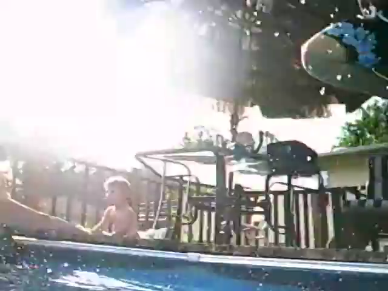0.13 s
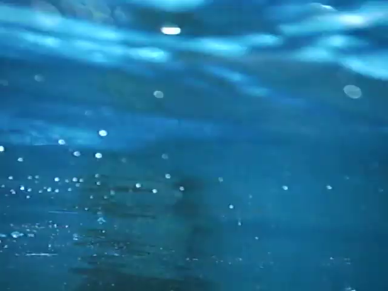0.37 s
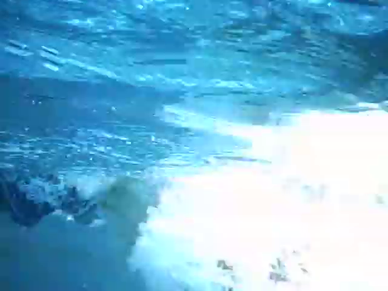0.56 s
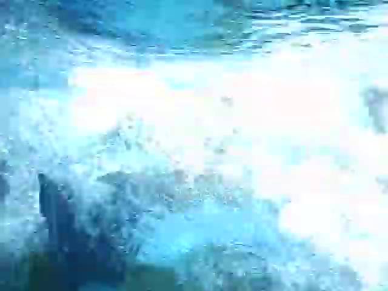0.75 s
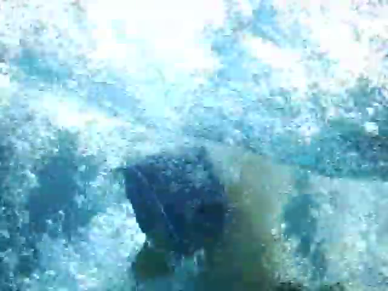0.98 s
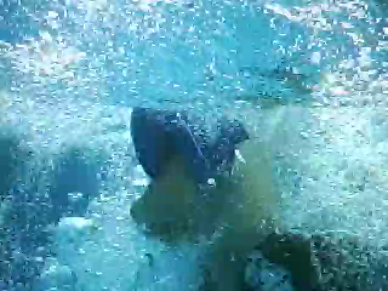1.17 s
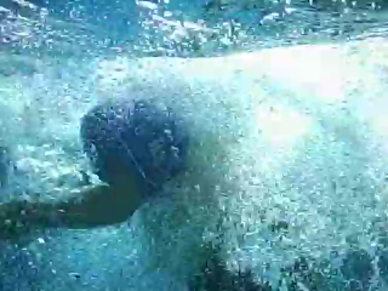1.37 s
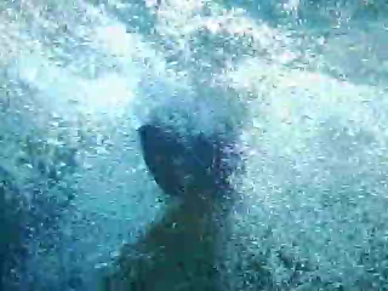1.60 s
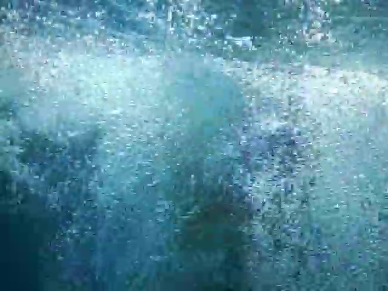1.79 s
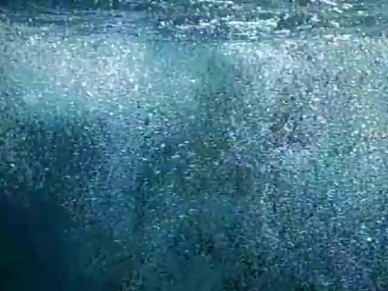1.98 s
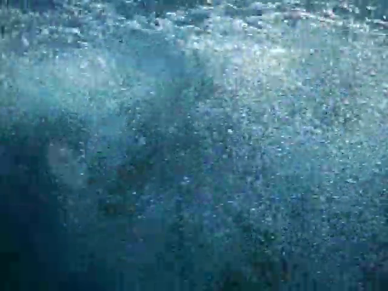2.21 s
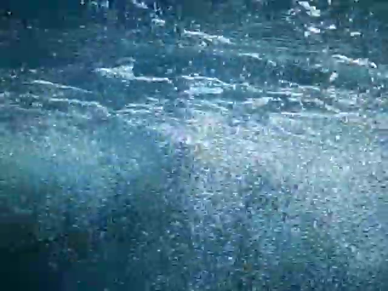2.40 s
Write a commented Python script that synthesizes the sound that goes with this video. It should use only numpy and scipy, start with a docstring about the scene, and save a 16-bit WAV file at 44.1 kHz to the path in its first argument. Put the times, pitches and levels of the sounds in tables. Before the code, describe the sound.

Heard close from inside a waterproof case, a harsh clipping plunge with knocking bubbles breaks out almost at once, then drops to dull underwater rushing and fine fizz, with soft glugs and gurgling near the end.

```python
"""Air pockets ring against a waterproof camera case, dunked as someone jumps into a pool beside it.
Each is a dying sine, the loudest strong enough to overload the microphone amplifier.
Crackling slaps, low thuds and glugs join in; clicks through case resonances and sine swarms fizz as a cloud.
Pitched swarms make the plunge's churn, an arm stroke and a gurgle near the end.
Filtered clicks wash round the case at the start, and filtered noise rumbles throughout."""
import sys
import numpy as np
from scipy import signal
from scipy.fft import rfft, irfft
from scipy.io import wavfile

SR = 44100
rng = np.random.default_rng(int(sys.argv[2]) if len(sys.argv) > 2 else 0)


def wrap_up_sound(samples):
    """Save the sound to the file named by the first command line argument, as 16-bit audio."""
    columns = np.atleast_2d(samples).T
    # keep every value between -1 and 1, then stretch to whole-number steps
    tamed = np.clip(columns, -1, 1)
    steps = np.round(tamed * 32767).astype(np.int16)
    wavfile.write(sys.argv[1], SR, steps)


N = 108045
TIME = np.arange(N) / SR  # s
HZ = np.fft.rfftfreq(N, 1 / SR)

# Tone of water striking the case, for slaps and pinch-off clicks: (frequency [Hz], gain [dB])
SLAP_COLOUR = [(60, -23.5), (300, 0.5), (700, 9.5), (1300, 11), (1900, 7), (3300, 6), (4200, -0.5)]
# Resonances of the case under water: (frequency [Hz], half-width at half gain [Hz], level [dB])
CASE_MODES = [(841.6, 56, 3), (1250, 55, -0.5), (1571, 88, 2.5), (1975, 63, -2.5), (2540, 27, -6)]
CASE_FLOOR_DB = -23  # gain added at every frequency beneath the resonances

WAVER, WAVER_HZ = 0.019, 60  # depth (share of pitch) and rate of a bubble's waver
PINCH_CYCLES = 1.07  # cycles a bubble takes to swell
BUBBLE_GLIDE = 0.071  # rise in log pitch over the ring time


def amp(db):
    """Decibels to gain."""
    return 10 ** (np.asarray(db) / 20)


def unit(x):
    """Scales to rms 1."""
    return x / np.sqrt(np.mean(x ** 2) + 1e-20)


def level(points):
    """Gain over time from (s, dB) points."""
    return amp(np.interp(TIME, *np.transpose(points)))


def colour(points, hz=HZ):
    """Gain over frequency from (Hz, dB) points, joined along log frequency."""
    f, db = np.transpose(points)
    return amp(np.interp(np.log(hz + 1), np.log(f), db))


def peaks(modes):
    """Gain over frequency of a set of resonances, summed in power."""
    power = sum(amp(db) ** 2 / (1 + ((HZ - hz) / width) ** 2) ** 2 for hz, width, db in modes)
    return np.sqrt(power)


def ring(x, gain):
    """Minimum-phase filter with the given gain, so sound follows its cause; output at rms 1."""
    cepstrum = irfft(np.log(np.maximum(gain, 1e-5)), N)
    # Folding the cepstrum forward makes the filter causal
    cepstrum[1:N // 2] *= 2
    cepstrum[N // 2:] = 0
    response = np.exp(rfft(cepstrum))
    return unit(irfft(rfft(x) * response, N))


def pops(per_s, spread_db):
    """Random clicks of either sign and uneven size."""
    size = amp(spread_db * np.minimum(rng.exponential(1, N), 4))
    sign = rng.choice([-1, 1], N)
    return size * sign * (rng.random(N) < per_s / SR)


def flutter():
    """A gain that wanders at random: smoothed noise in decibels."""
    depth_db, corner_hz = 1.5, 35  # rms depth; smoothing frequency
    smooth = np.exp(-(HZ / corner_hz) ** 2)
    wander = irfft(rfft(rng.standard_normal(N)) * smooth, N)
    return amp(depth_db * unit(wander))


def add(mix, s, sound):
    """Mixes a sound in at time s."""
    part = mix[round(s * SR):][:len(sound)]
    part += sound[:len(part)]


def bubble(hz, t60, attack_cycles, glide):
    """A pocket of air: a dying sine that swells quickly, then glides and wavers as it rings."""
    t = np.arange(0, t60, 1 / SR)
    waver = WAVER * np.sin(2 * np.pi * (WAVER_HZ * t + rng.random()))
    turns = np.cumsum(hz * np.exp(glide * t / t60 + waver)) / SR
    swell = 1 - np.exp(-(turns / attack_cycles) ** 2)
    decay = np.exp(-np.log(1000) * t / t60)  # down 60 dB at t60
    return swell * decay * np.sin(2 * np.pi * turns)


def swarm(pitch_colour, per_s, spread_db, count=36):
    """Many bubbles of random pitch and strength: each pitch rings at its own random clicks."""
    bubble_cycles = 47  # cycles until a bubble has died away
    out = np.zeros(N)
    pitches = np.geomspace(pitch_colour[0][0], pitch_colour[-1][0], count)
    for hz in pitches * rng.uniform(0.894, 1.041, count):
        one = bubble(hz, bubble_cycles / hz, PINCH_CYCLES, BUBBLE_GLIDE)
        one = one / np.linalg.norm(one)  # equal energy at every pitch
        births = pops(per_s / count, spread_db)
        out += colour(pitch_colour, hz) * signal.oaconvolve(births, one)[:N]
    return unit(out)


def flow():
    """Water washing round the case: clicks through two resonances, over a rumble of filtered noise."""
    # Resonances of the surface wash: (frequency [Hz], half-width at half gain [Hz], level [dB])
    lap_modes = [(1310, 88, -6), (2700, 38, -18.5)]
    # Wash at the surface: (time [s], level [dB])
    lap_level = [(0, -29.5), (.05, -30.5), (.105, -34), (.19, -79)]
    # Tone of the flow rumble: (frequency [Hz], gain [dB])
    rumble_colour = [(15, -7), (40, -4.5), (120, 2), (200, -2), (400, -10.5), (900, -23.5)]
    # Flow rumble: (time [s], level [dB])
    rumble_level = [(0, -40), (.19, -50), (.5, -38.5), (1.3, -47), (2.0, -41.5), (2.45, -45.5)]
    lap = ring(pops(per_s=4000, spread_db=1.2), peaks(lap_modes))
    rumble = ring(rng.standard_normal(N), colour(rumble_colour))
    return level(lap_level) * lap + level(rumble_level) * rumble


def cloud():
    """Countless tiny bubbles: each case resonance flutters on its own, and the finest tinkle above."""
    # Body of the bubble cloud: (time [s], level [dB])
    body_level = [(0, -31.5), (.11, -44.5), (.14, -43.5), (.19, -43), (.65, -30), (.74, -24), (1.0, -25),
                  (1.22, -28.5), (1.31, -25), (1.39, -32.5), (1.5, -29), (1.7, -36), (1.8, -29),
                  (2.24, -39), (2.27, -38), (2.45, -40)]
    # Finest fizz: (time [s], level [dB])
    fine_level = [(.1, -38.5), (.14, -46.5), (.25, -47.5), (.66, -29.5), (.92, -34), (1.3, -31),
                  (1.55, -42), (1.93, -34), (2.09, -45), (2.25, -43.5), (2.26, -37), (2.45, -31)]
    # Pitches in the finest fizz: (frequency [Hz], gain [dB])
    fine_colour = [(1800, -13.5), (2480, 3.5), (2850, -29), (3200, 8), (3550, 6), (4200, -10)]
    body = np.zeros(N)
    for hz, width, db in CASE_MODES:
        gain = peaks([(hz, width, 0)]) + amp(CASE_FLOOR_DB)
        body += amp(db) * flutter() * ring(pops(per_s=2200, spread_db=1.8), gain)
    fine = flutter() * swarm(fine_colour, per_s=3000, spread_db=1.7)
    return level(body_level) * unit(body) + level(fine_level) * fine


def churn():
    """Mid-sized bubbles churned up by the plunge: a dense swarm of ringing air pockets."""
    # Churn of the plunge: (time [s], level [dB])
    churn_level = [(.195, -71.5), (.21, -18.5), (.38, -29.5), (.5, -16.5), (.64, -20.5), (.69, -30),
                   (.8, -63)]
    # Pitches in the churn: (frequency [Hz], gain [dB])
    churn_colour = [(350, -23.5), (600, -11), (1050, 4.5), (1350, -1), (1700, -26), (3500, -17.5)]
    return level(churn_level) * swarm(churn_colour, per_s=1400, spread_db=2)


def slaps():
    """Sheets of water hit the case: bursts of filtered crackle that hold, then die exponentially."""
    # Slaps of water on the case: (start [s], held length [s], level [dB])
    slap_hits = [(0.197, 0.0034, -10), (0.2003, 0.032, -6.5), (0.262, 0.013, -2), (0.283, 0.046, -6),
                 (0.335, 0.044, -18), (0.408, 0.0074, -5), (0.423, .01, 3), (0.457, 0.047, -7.5),
                 (0.536, 0.00067, -11.5), (2.052, 0.0023, -23), (2.068, 0.0061, -23)]
    release_s = 0.0037
    envelope = np.zeros(N)
    for s, length, db in slap_hits:
        release = np.exp(-np.maximum(TIME - s - length, 0) / release_s)
        envelope += amp(db) * (TIME >= s) * release
    return envelope * ring(pops(per_s=4000, spread_db=-1), colour(SLAP_COLOUR))


def near_bubbles():
    """Bubbles click as they pinch off and ring, faint ones swelling more softly, over thuds and glugs."""
    # Single bubbles close to the case: (start [s], starting pitch [Hz], level [dB], ring time t60 [s])
    single_bubbles = [ (.1985, 634, 2, 0.048), (.199, 2606, 2, 0.017), (.207, 678, 10, 0.066),
                      (.2305, 1295, 9.5, 0.024), (.241, 1655, -13, 0.081), (.241, 3290, -10, 0.026),
                      (.256, 1170, 9, 0.011), (.259, 2990, 7.5, 0.011), (.2655, 3524, 11, 0.011),
                      (.272, 470, 7, 0.058), (.289, 1040, 4, 0.1), (.300, 1302, 13, 0.032),
                      (.310, 1385, -0.5, 0.042), (.326, 1250, 12.5, 0.012), (.342, 1230, -3, 0.028),
                      (.346, 3690, -1.5, 0.036), (.355, 770, 7, .061), (.356, 3580, 6.5, 0.015),
                      (.372, 1108, -6, 0.038), (.381, 2730, -5, 0.014), (.3888, 529.5, 13, 0.081),
                      (.411, 1180, 18, 0.015), (.425, 690, 6.5, 0.019), (.457, 858, 10, 0.1),
                      (.473, 676, 6.5, 0.056), (.475, 1224, 4.5, .03), (.488, 3460, 1, 0.011),
                      (.494, 1148, -1, 0.037), (.512, 3000, -4, 0.017), (.512, 1145, -9.5, 0.044),
                      (.524, 3140, -7.5, 0.039), (.528, 1397, -6.5, 0.068), (.5402, 1045, 5, 0.011),
                      (.544, 1411, -4.5, 0.091), (.5595, 1196, 15, 0.005), (.593, 3080, -5, 0.016),
                      (.593, 1920, -6.5, .02), (.5925, 1208, 3.5, 0.021), (.604, 1200, 4, 0.029),
                      (.606, 2710, -3.5, 0.0098), (.6145, 1043, 5.5, 0.043), (.649, 2050, -13, 0.025),
                      (.650, 855, -11.5, 0.064), (.786, 859, -7.5, 0.029), (.843, 862, -13, 0.079),
                      (.984, 1500, -16, 0.028), (1.091, 834, -15, 0.043), (1.150, 824, -7, 0.095),
                      (1.445, 799, -17, 0.061), (1.615, 3410, -16.5, 0.023), (1.787, 1630, -17, .04),
                      (1.892, 893, -9.5, 0.046), (1.932, 775, -6.5, 0.041), (1.9685, 760, -5.5, 0.058),
                      (1.980, 753, -8.5, 0.039), (2.006, 377, -9, 0.047), (2.030, 684, -6, 0.073),
                      (2.050, 1540, -12, 0.061), (2.073, 1180, -5, .015), (2.073, 2380, -14.5, 0.015),
                      (2.102, 1202, -10, .03), (2.191, 436, -8, 0.067), (2.1925, 683, -5.5, 0.017),
                      (2.218, 722, -7.5, 0.061), (2.335, 1620, -22.5, .06), (2.418, 3380, -20.5, .05)]
    # Thuds of large air pockets and moving water: (start [s], starting pitch [Hz], level [dB], t60 [s])
    low_thuds = [(.205, 148, -9.5, 0.086), (.283, 81, -7, 0.12), (.386, 180, 5.5, 0.032),
                 (.455, 199, 4, 0.046), (.72, 38, -34, 0.27)]
    # Slow falling glugs of displaced water: (start [s], starting pitch [Hz], level [dB], t60 [s])
    slow_glugs = [(.710, 165, -20, 0.2), (.845, 112, -17, 0.25), (1.10, 160, -14.5, 0.15),
                  (2.208, 115, -24, 0.24), (2.312, 200, -21.5, 0.2)]
    soft_db = -14.5  # a bubble this faint takes twice as long to swell
    pinch_db = -32.5  # rms level of the pinch-off clicks
    thud_cycles, glug_cycles = 0.77, 5.1  # cycles to swell
    thud_glide, glug_glide = -0.69, -1.5  # change in log pitch over the ring time
    out, clicks = np.zeros((2, N))
    for s, hz, db, t60 in single_bubbles:
        attack = PINCH_CYCLES * (1 + (min(db, 0) / soft_db) ** 2)
        add(out, s, amp(db) * bubble(hz, t60, attack, BUBBLE_GLIDE))
        add(clicks, s, [amp(db)])
    for s, hz, db, t60 in low_thuds:
        add(out, s, amp(db) * bubble(hz, t60, thud_cycles, thud_glide))
    for s, hz, db, t60 in slow_glugs:
        add(out, s, amp(db) * bubble(hz, t60, glug_cycles, glug_glide))
    return out + amp(pinch_db) * ring(clicks, colour(SLAP_COLOUR))


def stroke():
    """Small bubbles stirred up by the swimmer's arm: a dense swarm of ringing air pockets."""
    # Arm stroke: (time [s], level [dB])
    stroke_level = [(1.1, -63), (1.19, -28), (1.31, -27.5), (1.42, -40.5)]
    # Pitches in the stroke: (frequency [Hz], gain [dB])
    stroke_colour = [(1080, -10), (1650, 4), (2200, -6)]
    return level(stroke_level) * swarm(stroke_colour, per_s=2500, spread_db=1.5)


def gurgle():
    """Larger bubbles tumble past: a sparser, lower swarm, with snaps ringing the case as they split."""
    # Gurgle: (time [s], level [dB])
    gurgle_level = [(1.41, -54), (1.5, -35.5), (1.6, -64.5), (1.79, -28.5), (1.97, -23), (2.06, -20),
                    (2.13, -24), (2.22, -27.5), (2.27, -44)]
    # Pitches in the gurgle: (frequency [Hz], gain [dB])
    gurgle_colour = [(180, -16), (420, -0.5), (560, 0), (740, 8), (1000, -5), (1400, -13.5), (1600, 3.5),
                     (2300, -25)]
    snap_db = -9  # snaps relative to plops
    snaps = ring(pops(per_s=300, spread_db=3), peaks(CASE_MODES) + amp(CASE_FLOOR_DB))
    plops = swarm(gurgle_colour, per_s=600, spread_db=1.3)
    return level(gurgle_level) * (plops + amp(snap_db) * snaps)


def scene():
    """All the water sounds at the case, as one channel."""
    surroundings = flow() + cloud()
    plunge = churn() + slaps() + near_bubbles()
    return (surroundings + plunge + stroke() + gurgle())[None]


def record(dry):
    """The amplifier overloads on loud peaks, a narrow voice band follows, and the highest peaks clip again."""
    # Voice band of the microphone: (frequency [Hz], gain [dB])
    band_shape = [(5, -53), (25, -4.5), (50, 2.25), (3300, -1.77), (3800, -9.5), (4300, -18.5), (4500, -29),
                  (4750, -100)]
    overload, knee, ceiling = .745, 6, .705  # amplifier limit, its hardness, clip level
    fade_s, edge_hz = .004, 16000  # fade at both ends; final low-pass
    driven = dry / (1 + np.abs(dry / overload) ** knee) ** (1 / knee)
    voice_band = irfft(rfft(driven) * colour(band_shape), N)
    clipped = np.clip(voice_band, -ceiling, ceiling)
    from_ends = np.minimum(TIME, TIME[::-1])
    fade = np.sin(np.pi / 2 * np.minimum(from_ends / fade_s, 1)) ** 2
    low_pass = signal.firwin(511, edge_hz, window=("kaiser", 9), fs=SR)
    return signal.oaconvolve(clipped * fade, low_pass[None], "same")


dry = scene()
out = record(dry)
wrap_up_sound(out)
```